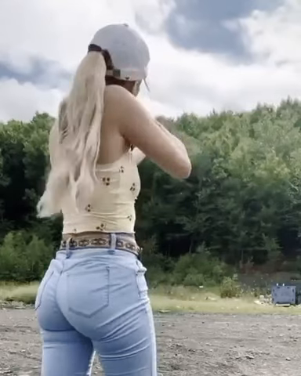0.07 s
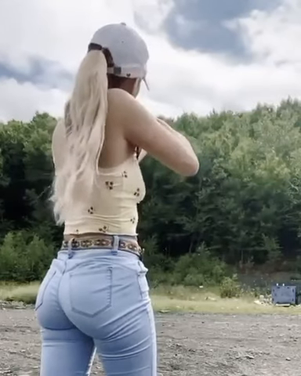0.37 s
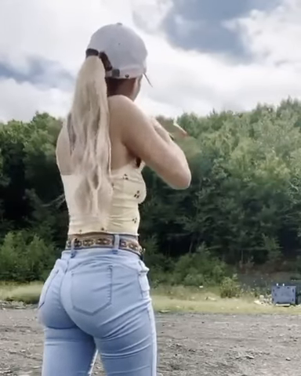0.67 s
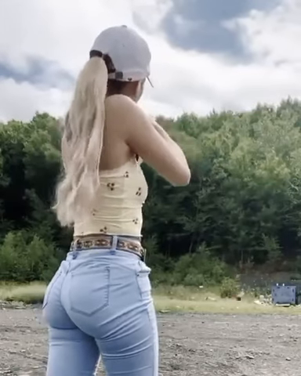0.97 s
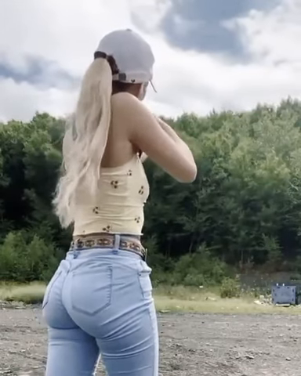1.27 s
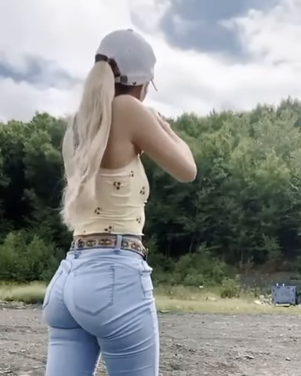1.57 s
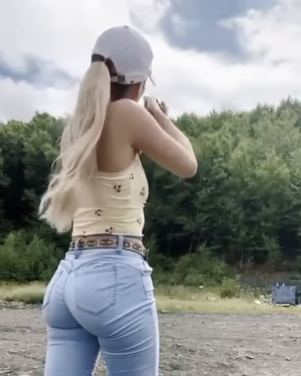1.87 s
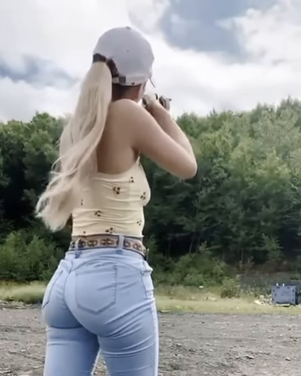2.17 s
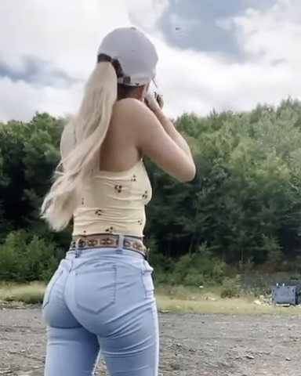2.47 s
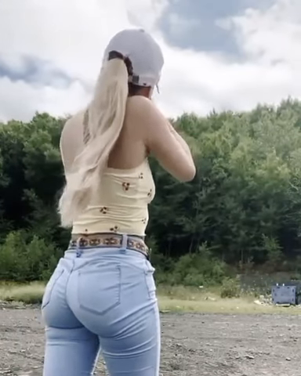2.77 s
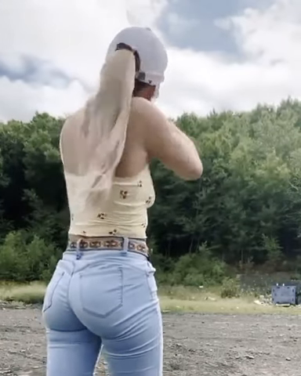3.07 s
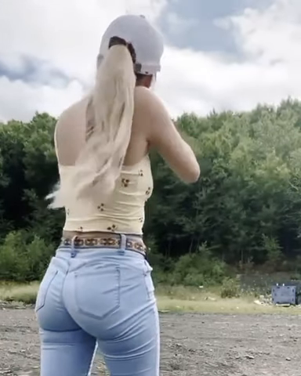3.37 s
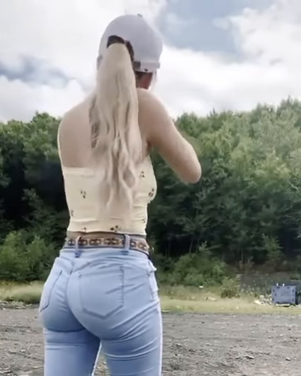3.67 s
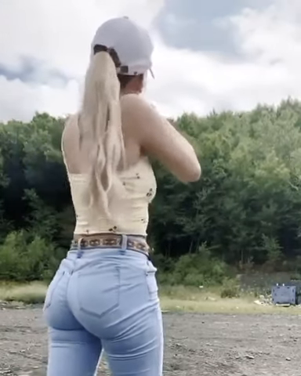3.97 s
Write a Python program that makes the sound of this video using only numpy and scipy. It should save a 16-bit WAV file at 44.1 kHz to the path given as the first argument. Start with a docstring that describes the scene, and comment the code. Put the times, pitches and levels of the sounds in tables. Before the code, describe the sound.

A loud, close shotgun blast cracks right at the start, its echo rolling off a wooded hillside. The steel action slides and clacks at about 0.8 and 1.1 seconds, and a spent shell clicks on gravel at 1.4. Faint rustles, soft knocks and light wind on the microphone follow. A second blast comes at 3.2 seconds, echoing, with one more clack near 4 seconds.

```python
"""Two shotgun blasts on a gravel range

We stand close behind the shooter, and the first blast has just begun as the scene opens.
Each shot slaps back from a near bank, then rolls off a wooded hillside. The gun's steel action
slides and clacks, a spent shell lands, clothes and gravel rustle, and light wind buffets the microphone."""
import sys
import numpy as np
from scipy import signal
from scipy.fft import rfft, irfft
from scipy.io import wavfile

SR = 44100
rng = np.random.default_rng(int(sys.argv[2]) if len(sys.argv) > 2 else 0)


def digitize_waveform(pressure):
    """Quantize a signal to 16-bit integers and store it at the path in sys.argv[1].

    Rows of a 2-D input are taken as channels; values are limited to [-1, 1].
    """
    field = np.atleast_2d(pressure).T
    bounded = np.clip(field, -1, 1)
    quanta = np.round(bounded * 32767).astype(np.int16)
    wavfile.write(sys.argv[1], SR, quanta)


N = 176400

# The two shots. Each row: start in seconds, blast gain in dB, echo gain in dB.
SHOT_TIMES = [(-0.011, 2, 0), (3.234, 1.5, -2.5)]
# The tone of the blast's hard crack. Each row: frequency in Hz, relative level in dB.
CRACK_TONE = [(300, -26), (1000, 0), (1350, 10), (1700, -8.5), (2100, -3.5), (2800, 3.5), (4000, -15.5),
              (5300, -7), (6200, -12), (8000, -0.5), (10500, -20), (12800, -5), (15000, -22.5)]
# How alike left and right are in the blast. Each row: frequency in Hz, likeness (1 means the same).
BLAST_STEREO = [(100, 1), (300, 1), (600, .4), (1200, -.3), (3000, 0.31), (8000, -0.32), (12000, 0.14)]
# How alike they are in the open air. Each row: frequency in Hz, likeness.
OUTDOOR_STEREO = [(60, 0.65), (250, .86), (1000, 0.83), (2000, 0.029), (4000, 0), (12000, 0.23)]
WOOD_DELAY_S = 0.22  # the echo from the edge of the wood takes this long


def blasts():
    """The muzzle blast with its hard crack, its bounce off the ground and the scatter from the gravel."""
    # Each row: band centre in Hz, level in dB, seconds to fade by 60 dB, bounce in dB, scatter in dB.
    blast_bands = [(51, -34, 0.14, -40, -56), (129, -33, .14, -35, -48), (233, -20, .07, -32.5, -42),
                   (400, -24, 0.17, -29.5, -46), (610, -21.5, 0.094, -25.5, -52),
                   (1000, -21, 0.064, -28, -59), (1400, -20, 0.06, -27, -55),
                   (2210, -25.5, 0.099, -22, -57), (3000, -24.5, .065, -20.5, -56),
                   (4700, -27.5, .065, -35, -57.5), (7600, -28.5, 0.089, -34, -56.5),
                   (10100, -40.5, .06, -43, -63.5), (13000, -30, 0.074, -37.5, -54)]
    ground_delay_s = 0.0202
    out, rough = 0, grain(rate=1100, spread_db=1.5)
    for shape, (_, db, t60, bounce_db, scatter_db) in zip(bands(blast_bands), blast_bands):
        close, scatter = 0, 0
        for start, shot_db, echo_db in SHOT_TIMES:
            t = since(start)
            direct = np.exp(np.minimum(t, 0) / 0.004) * fade(t - 0.0043, t60)
            bounce = undb(bounce_db) * burst(t - ground_delay_s, rise=0.0027, hold=0.0014, fall=0.0031)
            close += undb(shot_db) * np.hypot(undb(db) * direct, bounce)
            near = undb(shot_db + db - 15) * fade(t - ground_delay_s, t60=0.2)
            far = undb(echo_db + scatter_db) * fade(t, t60=2) * fade(t - WOOD_DELAY_S, t60=0.32)
            scatter += (t > 0) * np.hypot(far, near)
        blast = close * noise(shape, along(BLAST_STEREO))
        gravel = scatter * noise(shape, along(OUTDOOR_STEREO))
        out += rough * (blast + gravel)
    cracks = [(start + 0.0096, db - 17, 0.00073) for start, db, _ in SHOT_TIMES]
    out += hits(cracks, rise=0.0003, hold=0.0051) * toned_noise(CRACK_TONE, along(BLAST_STEREO))
    return close_echo(out) * pan(left_db=-1)


def close_echo(x):
    """A reflection from right beside the microphone makes the blast sound hollow."""
    lag, gain = int(0.00287 * SR), undb(-12.5)
    delayed = np.pad(x, ((0, 0), (lag, 0)))[:, :N]
    return (x + gain * delayed) / np.hypot(1, gain)


def muzzle_bark():
    """The muzzle rings with a few broad tones as each blast begins, mostly on the left."""
    # Each row: frequency in Hz, relative level in dB.
    bark_tone = [(400, -35.5), (560, -11), (640, 0.5), (740, -8.5), (880, -14), (1030, 0), (1180, -7.5),
                 (1340, 3), (1500, -12), (2200, -35)]
    force = hits([(start, db - 16.5, 0.0056) for start, db, _ in SHOT_TIMES], rise=0.0036, hold=0.0095)
    return force * toned_noise(bark_tone, along(BLAST_STEREO)) * pan(left_db=6)


def pressure_wave():
    """The pressure wave and the thumps of air after it reach the left side just before the right."""
    # The wave swings to and fro. Each row: delay in seconds, pitch in Hz, level in dB, decay in seconds.
    wave_swings = [(.007, 258.6, -4.5, 0.0021), (0.0134, 105, -14.5, 0.0043)]
    # Air hits the microphone. Each row: start in seconds, pitch in Hz, level in dB, decay in seconds.
    air_thumps = [(.037, 57.3, -16.5, .013), (.168, 70, -27.5, .007), (.217, 62, -24.5, 0.0099),
                  (3.276, 71.6, -25, 0.0069)]
    rows = air_thumps + [(start + delay, hz, db + shot_db, decay)
                         for start, shot_db, _ in SHOT_TIMES for delay, hz, db, decay in wave_swings]
    left = sum(swing(*row) for row in rows)
    right = sum(swing(start + 0.00032, hz, db, decay) for start, hz, db, decay in rows)
    return np.array([left, right])


def slap_echoes():
    """Near objects, the bank, the wood's edge and a rock face send back knocks, each with a thin crack."""
    # Each row: delay in seconds, pitch in Hz, level in dB, decay in seconds.
    surfaces = [(0.0635, 420, -21.5, 0.0021), (.1235, 340, -18.5, 0.0015), (.138, 396, -23.5, 0.001),
                (.2215, 237, -22.5, 0.0024), (.2335, 856, -23.5, 0.0043), (.3525, 725, -15.5, 0.00088)]
    rows = [(start + delay, hz, db + echo_db, decay)
            for start, _, echo_db in SHOT_TIMES for delay, hz, db, decay in surfaces]
    cracks = hits([(start, db - 27, 0.0046) for start, _, db, _ in rows], rise=0.00056)
    return sum(swing(*row) for row in rows) + cracks * toned_noise(CRACK_TONE, likeness=0.38)


def hillside_echo():
    """Bushes answer first, then countless trees, the treble dying soonest, and far slopes rumble on."""
    # Each row: band centre in Hz, level at the crest in dB, level at the wood's edge in dB,
    # delay of the crest in seconds, seconds for the trees' echo to fade by 60 dB.
    hill_bands = [(51.3, -53.5, -45, 0.38, 0.92), (132, -47.5, -42, 0.57, 0.37),
                  (230, -42.5, -40, 0.43, 1.33), (344, -32, -35, .36, 1.176),
                  (558, -31.5, -37.5, .36, 1.14), (820, -26, -41, 0.36, 0.94), (1080, -34, -38, 0.25, 1.35),
                  (1400, -36, -46, 0.34, 1.12), (1850, -35, -35, 0.3, 1.174), (3440, -42, -35, 0.3, 1.17),
                  (4960, -51.5, -40.5, 0.44, 0.83), (7800, -49, -38.5, 0.35, 0.79),
                  (10200, -61.5, -52, 0.42, 0.25), (12800, -42, -45.5, 0.17, 0.66)]
    out, rough = 0, grain(rate=280, spread_db=1.0)
    for shape, (_, crest_db, edge_db, crest, t60) in zip(bands(hill_bands), hill_bands):
        level = 0
        for start, _, echo_db in SHOT_TIMES:
            t = since(start)
            early = np.minimum(t - WOOD_DELAY_S, 0)
            bushes = undb(-8) * np.exp(early / 0.045)
            onset = np.maximum(np.exp(early / 0.0017), bushes)
            swell = undb(echo_db + np.interp(t, [WOOD_DELAY_S, crest], [edge_db, crest_db]))
            trees = fade(t - crest, t60)
            far_slopes = undb(-16.5) * fade(t - crest, 2.22 * t60)
            level += onset * swell * np.hypot(trees, far_slopes)
        out += level * rough * grain(rate=45, spread_db=2.44) * noise(shape, along(OUTDOOR_STEREO))
    return out


def gun_action():
    """Steel slides and slams against its stops, ringing the gun's body; the range answers faintly."""
    # Each row: start in seconds, level in dB, decay in seconds, ring in dB relative to the clack.
    clacks = [(.7984, -47, 0.0034, -7.5), (0.8176, -28, .005, -1.5), (1.044, -52, 0.0084, -9),
              (1.1201, -37.5, 0.0045, -5.5), (1.1401, -28, 0.012, -15.5), (1.1504, -49, 0.0021, -5),
              (3.963, -35, 0.013, -16)]
    # Each row: start in seconds, length in seconds, level in dB.
    slides = [(.755, 0.023, -53), (.785, 0.034, -46.5), (.828, 0.026, -46), (1.078, 0.034, -47),
              (1.152, 0.014, -47.5), (3.93, 0.056, -55.5)]
    # Steel on steel. Each row: frequency in Hz, relative level in dB.
    steel_tone = [(100, -22.5), (300, 0), (1000, -4.5), (1700, 1.5), (2700, -3.5), (4200, 3), (6000, -1.5),
                  (8000, 0), (10500, -12), (12500, -9), (15000, -24.5)]
    # Each row: pitch in Hz, relative level in dB, seconds to fade by 60 dB.
    body_notes = [(1230, 0, 0.029), (1651, 1.5, 0.047), (1990, 6, 0.017), (3240, -6.5, .02),
                  (3964, -5.5, 0.09), (4410, -13.5, 0.037), (5260, -16, 0.075), (6840, -8.5, .06),
                  (7700, -17, 0.096), (9260, -24, .09), (12300, -11, .1)]
    scrape = strokes(slides, edge=0.0035) * grain(rate=500, spread_db=3)
    force = hits([row[:3] for row in clacks], rise=0.0009, hold=0.00067) + scrape
    ring_hits = [(start, db + ring_db, decay) for start, db, decay, ring_db in clacks]
    ring_force = hits(ring_hits, rise=0.0009, hold=0.0013) + undb(-15.5) * scrape
    steel = toned_noise(steel_tone, likeness=0.2)
    t = since(0)[:SR // 2]
    body = sum(undb(db) * fade(t, t60) * np.sin(2 * np.pi * hz * t) for hz, db, t60 in body_notes)
    ring = signal.fftconvolve(ring_force * steel, body[None] / np.linalg.norm(body), axes=1)[:, :N]
    direct = force * steel + ring
    tail = rng.standard_normal((2, N)) * fade(since(0), t60=1.5)
    echo = signal.fftconvolve(direct, tail / np.linalg.norm(tail[0]), axes=1)[:, :N]
    return direct + undb(-29.5) * echo


def metal_ticks():
    """Small steel parts tick after each shot and as the gun is handled."""
    # Each row: start in seconds, level in dB, decay in seconds.
    ticks = [(.122, -42, .002), (1.677, -70, 0.0023), (1.71, -64, .002), (2.1, -72, 0.0018),
             (3.3675, -35.5, 0.0025)]
    # Each row: frequency in Hz, relative level in dB.
    tick_tone = [(500, -30), (3000, 3), (6500, -4), (8300, 2), (10500, -8), (12500, -19), (15000, -31)]
    return hits(ticks, rise=0.0005) * toned_noise(tick_tone, likeness=0.44)


def spent_shell():
    """The hollow plastic case clicks on the gravel, one end and then the other."""
    # Each row: start in seconds, level in dB, decay in seconds.
    landings = [(1.4408, -40.5, 0.0031), (1.4462, -39, 0.0028)]
    # Each row: frequency in Hz, relative level in dB.
    shell_tone = [(150, -40), (550, -5.5), (1120, -5), (1250, 10), (1400, -9), (2600, -23), (4100, 0.5),
                  (5200, -13), (6200, -9), (8000, -13.5), (10000, -24), (12500, -19), (15000, -25)]
    return hits(landings, rise=0.00055) * toned_noise(shell_tone, likeness=0.26)


def handling():
    """Soft knocks, and rustles of clothes and gravel, as the shooter shifts her stance."""
    # Each row: start in seconds, level in dB, decay in seconds.
    knocks = [(1.988, -60, 0.0051), (2.16, -63, .01), (2.27, -56, .012), (2.331, -51, 0.0043),
              (2.581, -50, 0.021), (2.603, -55, 0.011), (3.044, -58, 0.06), (3.136, -56.5, 0.0045)]
    # Each row: start in seconds, length in seconds, level in dB.
    rustles = [(1.66, 0.16, -68.5), (1.93, 0.086, -63), (2.06, 0.31, -64.5), (3.03, 0.21, -87.5)]
    # Each row of these two: frequency in Hz, relative level in dB.
    knock_tone = [(100, 7), (300, 0), (480, 10.5), (800, -4.5), (1600, -4), (3000, -25), (8000, -33),
                  (14000, -55)]
    rustle_tone = [(200, 9), (700, 8), (1500, 0.5), (4000, -14.5), (8000, -18.5), (13000, -40)]
    knocking = hits(knocks, rise=0.0018) * toned_noise(knock_tone, likeness=0.5)
    rubbing = strokes(rustles, edge=0.02) * grain(rate=150, spread_db=4.5)
    return knocking + rubbing * toned_noise(rustle_tone, likeness=0.46)


def wind():
    """Gusts rumble on the microphone over the steady hush of the open air."""
    # Each row: time in seconds, level in dB.
    gusts = [(0, -39), (1.1, -65.5), (1.33, -55.5), (1.54, -72), (1.621, -53.5), (1.68, -49.5),
             (1.77, -56.5), (1.84, -49), (1.88, -58), (1.915, -43.5), (1.95, -57), (1.99, -50),
             (2.11, -54.5), (2.16, -45), (2.23, -55), (2.45, -64), (2.919, -69), (3.049, -62), (4, -65.5)]
    # Each row of these two: frequency in Hz, relative level in dB.
    rumble_tone = [(20, -22.5), (40, -12.5), (60, 2), (85, -6), (130, -17.5), (250, -27), (600, -28.5),
                   (2000, -66.5)]
    hush_tone = [(20, -25.5), (60, 0.5), (150, -1.5), (400, -4), (900, -8), (2000, -19.5), (4000, -28),
                 (6500, -33), (8000, -28.5), (10000, -43.5), (14000, -42)]
    strength = undb(np.interp(since(0), *np.array(gusts).T))
    rumble = strength * toned_noise(rumble_tone, likeness=0.59)
    return rumble + undb(-66) * toned_noise(hush_tone, along(OUTDOOR_STEREO))


def undb(db):
    """Turn decibels into a gain."""
    return 10 ** (np.asarray(db) / 20)


def pan(left_db):
    """Two gains that put the left side this many dB above the right."""
    return undb(np.array([[left_db], [-left_db]]) / 2)


def since(start):
    """Seconds since a moment, for every sample."""
    return np.arange(N) / SR - start


def along(points):
    """Join (Hz, value) points into a curve over all frequencies."""
    hz, value = np.array(points, float).T
    return np.interp(np.log(np.arange(N // 2 + 1) * SR / N + 1), np.log(hz), value)


def noise(gain, likeness):
    """Stereo noise of average strength 1, shaped by a gain at each frequency."""
    alike = np.clip(likeness, -1, 1)
    mid, side = rfft(rng.standard_normal((2, N))) * gain
    mid, side = mid * np.sqrt(1 + alike), side * np.sqrt(1 - alike)
    x = irfft(np.array([mid + side, mid - side]), N)
    return x / x.std()


def toned_noise(tone, likeness):
    """Stereo noise shaped by (Hz, dB) points."""
    return noise(undb(along(tone)), likeness)


def bands(table):
    """Overlapping frequency bands centred on the first column of a table."""
    centres = [row[0] for row in table]
    rumble_cut = np.clip(np.arange(N // 2 + 1) * SR / N / centres[0], 0, 1) ** 2
    return [rumble_cut * np.sqrt(along([(hz, hz == centre) for hz in centres])) for centre in centres]


def burst(t, rise, hold, fall):
    """A level that rises, holds and falls away; times are in seconds."""
    return np.exp(np.minimum(t, 0) / rise - np.maximum(t - hold, 0) / fall)


def fade(t, t60):
    """Fade by 60 dB in t60 seconds."""
    return np.exp(-np.log(1000) * np.maximum(t, 0) / t60)


def grain(rate, spread_db):
    """A rough gain that moves to a new random level `rate` times a second."""
    draws = rng.standard_normal(N)
    gain = undb(spread_db * np.interp(since(0) * rate, np.arange(N), draws))
    return gain / np.sqrt(np.mean(gain ** 2))


def swing(start, hz, db, decay):
    """A pressure swing that builds up and dies within a few cycles."""
    t = np.maximum(since(start), 0)
    return undb(db) * t / decay * np.exp(1 - t / decay) * np.sin(2 * np.pi * hz * t)


def hits(table, rise, hold=0):
    """The force of a series of short contacts."""
    return sum(undb(db) * burst(since(start), rise, hold, decay) for start, db, decay in table)


def strokes(table, edge):
    """The force of a series of rubbing strokes."""
    return sum(undb(db) * burst(since(start), edge, length, edge) for start, length, db in table)


def scene():
    """Everything heard on the range."""
    shots = blasts() + muzzle_bark() + pressure_wave() + slap_echoes() + hillside_echo()
    return shots + gun_action() + metal_ticks() + spent_shell() + handling() + wind()


def record(dry):
    """The phone rounds off the peaks of the blast and cuts the highest treble."""
    ceiling, top_hz = 0.83, 13200
    rounded = ceiling * np.tanh(dry / ceiling)
    return signal.sosfilt(signal.ellip(8, 0.2, 70, top_hz, fs=SR, output="sos"), rounded)


dry = scene()
out = record(dry)
digitize_waveform(out)
```